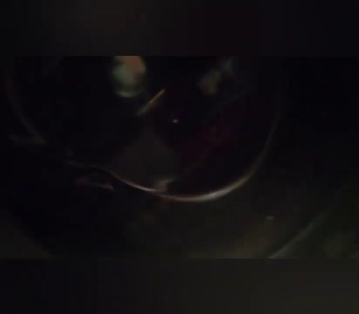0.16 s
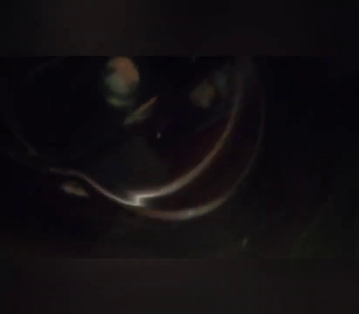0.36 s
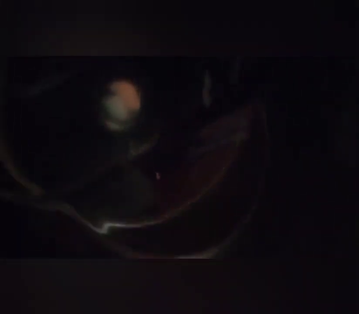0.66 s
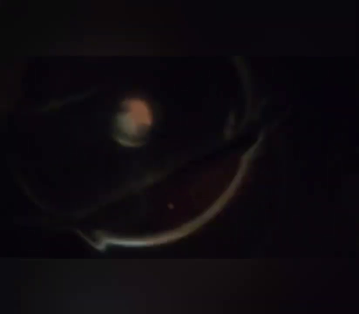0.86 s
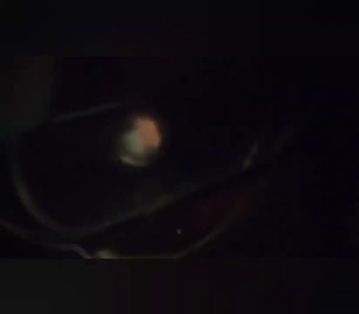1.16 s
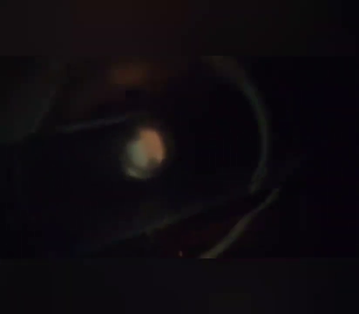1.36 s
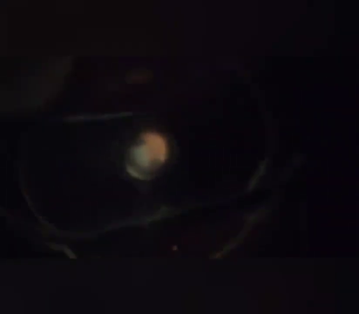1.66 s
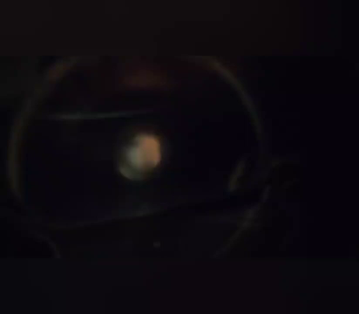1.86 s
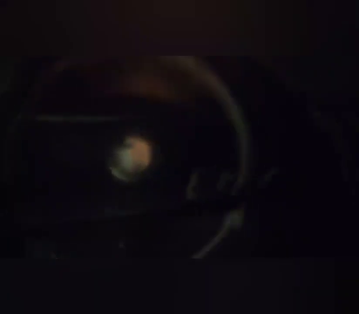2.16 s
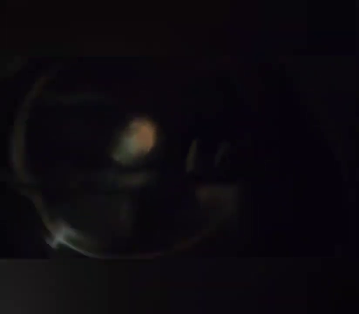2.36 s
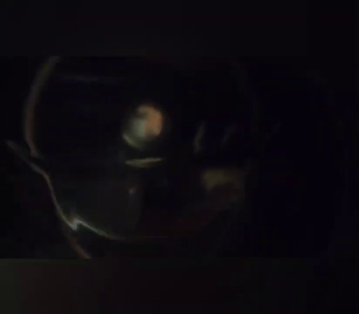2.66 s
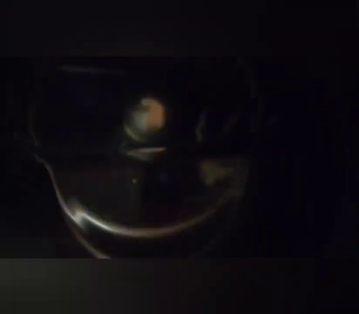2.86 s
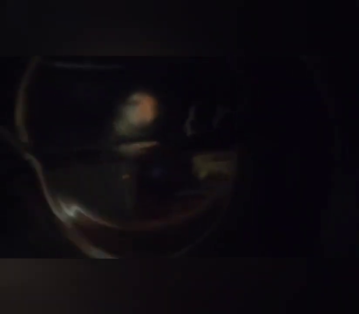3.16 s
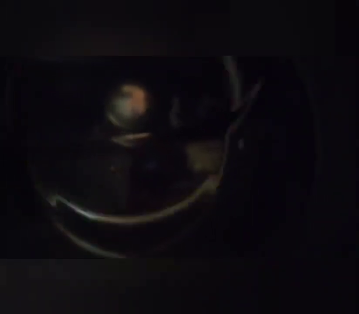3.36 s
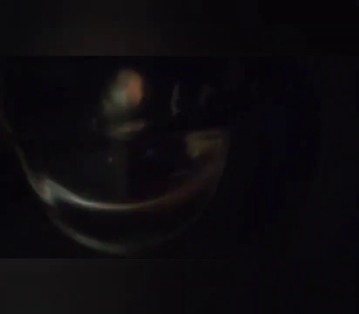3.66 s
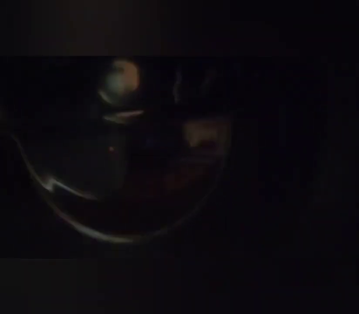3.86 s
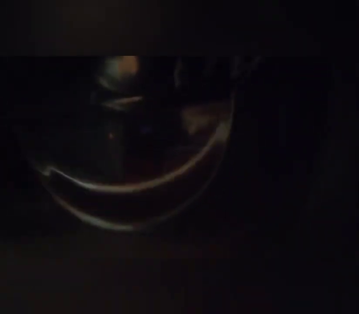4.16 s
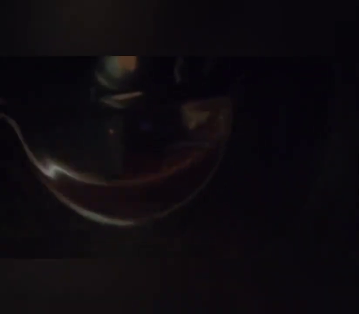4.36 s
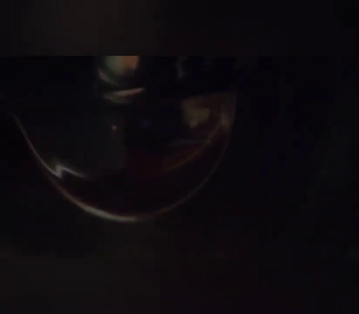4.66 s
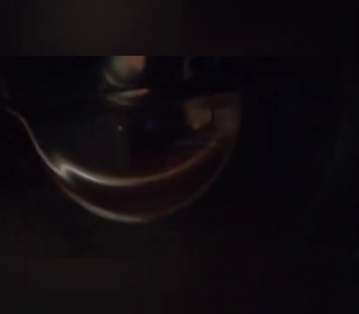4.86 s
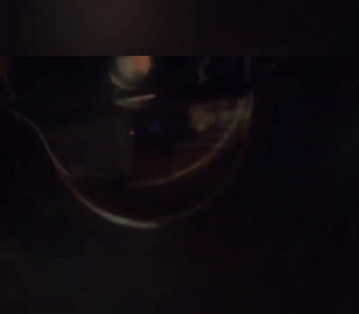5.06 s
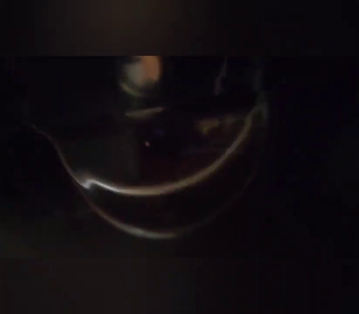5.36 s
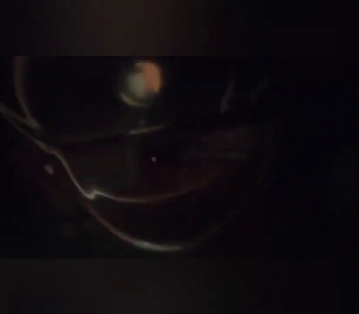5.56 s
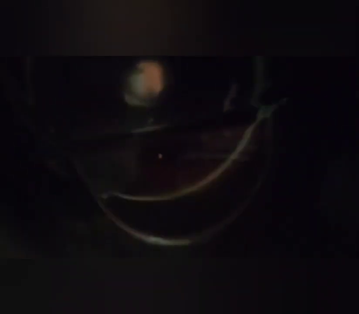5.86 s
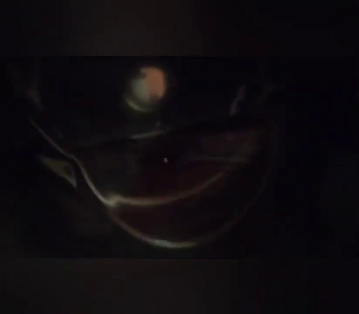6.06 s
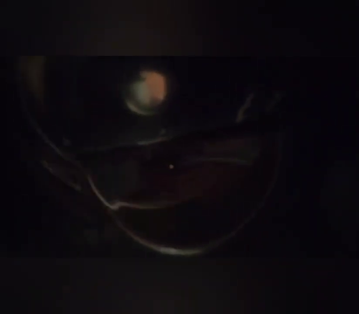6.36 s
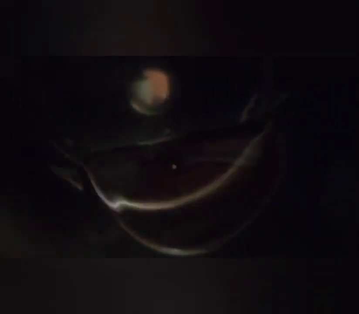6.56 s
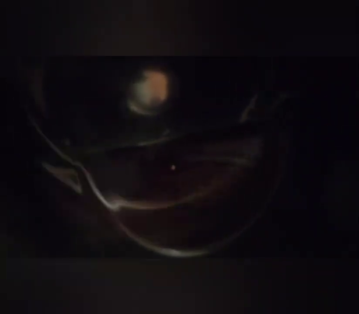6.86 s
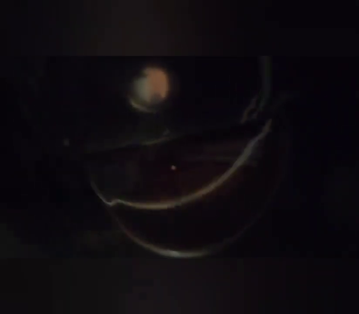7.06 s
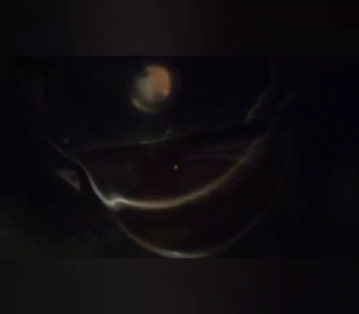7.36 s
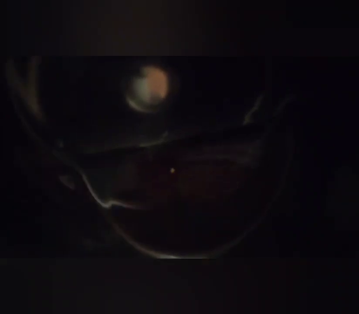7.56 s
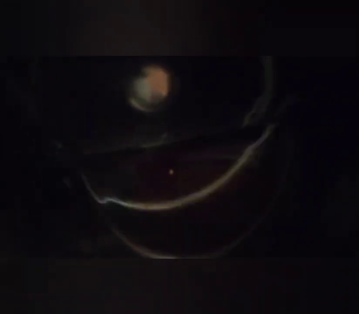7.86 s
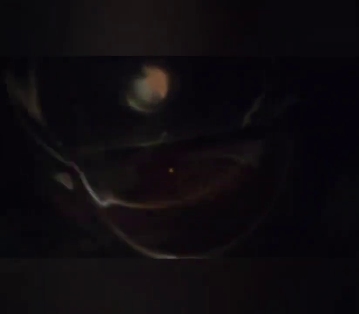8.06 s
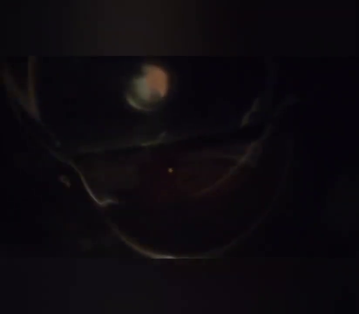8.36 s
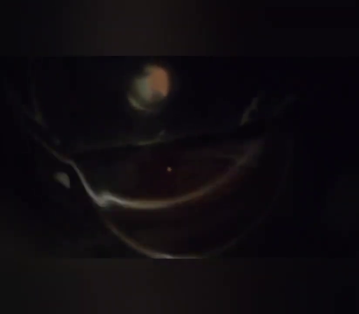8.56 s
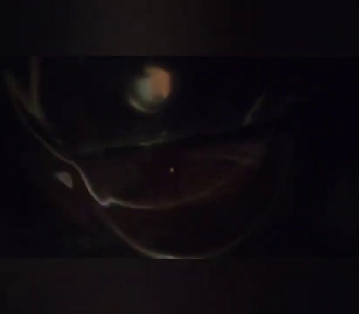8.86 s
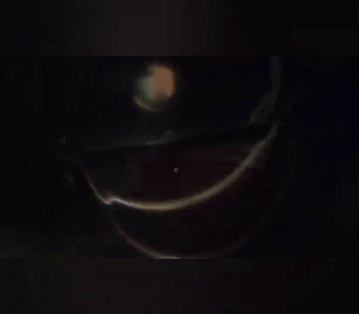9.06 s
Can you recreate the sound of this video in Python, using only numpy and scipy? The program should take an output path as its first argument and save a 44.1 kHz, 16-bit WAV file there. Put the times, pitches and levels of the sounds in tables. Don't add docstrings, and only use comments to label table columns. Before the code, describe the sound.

Close, continuous spin-cycle noise indoors: a deep cabinet drone with rapid drum throbbing, mains hum, and shrill whining from the brush motor. Rapid knocks ring lightly on the tub within broad watery hiss and gritty electrical buzz. Around one to two seconds a trim buzz joins, stronger on the left. The hand-held stereo pickup drifts, changing the tone, then settles into steadier noise.

```python
import sys
import numpy as np
from scipy import signal
from scipy.fft import irfft, next_fast_len
from scipy.io import wavfile
from scipy.ndimage import uniform_filter1d, map_coordinates

SR = 44100
rng = np.random.default_rng(int(sys.argv[2]) if len(sys.argv) > 2 else 0)


def level_to_linear(level):
    exponent = np.asarray(level, float) / 20
    return 10 ** exponent


def unload_wav(signal):
    wavfile.write(
        sys.argv[1],
        SR,
        np.round(np.clip(np.atleast_2d(signal).T, -1, 1) * 32767).astype(np.int16),
    )


N = 405719

DRUM_HZ, MOTOR_HZ, MAINS_HZ = 12.44651, 197.91, 49.945
DRUM_START = 0.011
T = np.arange(N) / SR
COARSE = T[::64]
SIZE = next_fast_len(N + 8192)
GRID = np.fft.rfftfreq(SIZE, 1 / SR)


def along(points, hz):
    f, v = np.transpose(points)
    return np.interp(np.log(hz + 1), np.log(f + 1), v)


def curves(rows):
    s, *cols = np.transpose(rows)
    return np.array([np.interp(COARSE, s, v) for v in cols])


def wobble(rate, count=2):
    knots = rng.standard_normal((count, int(N * rate / SR) + 4))
    return np.array([map_coordinates(k, [COARSE * rate]) for k in knots])


def sing(hz, envelope):
    angle = 2 * np.pi * hz * T
    c, s = np.cos(angle), np.sin(angle)
    ports = []
    for e in envelope:
        real = np.interp(T, COARSE, e.real)
        imag = np.interp(T, COARSE, e.imag)
        ports.append(real * c - imag * s)
    return np.sqrt(2) * np.array(ports)


# (frequency [Hz], left-right correlation)
PORT_LIKENESS = [(60, 1), (130, 0.74), (290, 0.87), (640, 0.093), (1410, -0.17), (3100, 0.017),
                 (6820, -0.009), (15000, -0.058)]
# (frequency [Hz], left minus right [dB])
PORT_LEAN = [(60, -1), (150, 2.5), (400, 3.5), (1400, 6.5), (4000, 1), (6200, 4.5), (7300, -6.5),
             (8600, -16), (10200, 0), (14500, 9.5)]


def lean_db(hz):
    return along(PORT_LEAN, hz) * np.array([[.5], [-.5]])


def stereo(gain):
    a, b = rng.standard_normal((2, len(GRID))) + 1j * rng.standard_normal((2, len(GRID)))
    mix = np.arccos(np.clip(along(PORT_LIKENESS, GRID), -1, 1)) / 2
    lean = level_to_linear(along(PORT_LEAN, GRID) / 2)
    left = (a * np.cos(mix) + b * np.sin(mix)) * lean
    right = (a * np.cos(mix) - b * np.sin(mix)) / lean
    top = np.where(GRID < 15250, 1, .3)
    spectrum = np.array([left, right]) * gain * top
    return irfft(spectrum * np.sqrt(SIZE * SR) / 2, SIZE)[:, :N]


def fading(hz, db, width_hz):
    power = np.zeros(len(GRID))
    near = np.round(hz / GRID[1]).astype(int)[:, None] + np.arange(-90, 91)
    width = width_hz[:, None]
    bell = np.exp(-.5 * ((GRID[near] - hz[:, None]) / width) ** 2) / width
    np.add.at(power, near, level_to_linear(db)[:, None] ** 2 * bell / np.sqrt(2 * np.pi))
    return stereo(np.sqrt(power))


# (drum order, level [dB rms])
CABINET_SHAKE = [(1, -39.5), (2, -54), (3, -53), (4, -51.5), (5, -43), (6, -62), (7, -62), (8, -75),
                 (9, -31.0), (10, -34.5), (11, -35), (12, -59.5), (13, -55), (14, -82), (15, -47.0),
                 (16, -83), (17, -60.5), (18, -66), (19, -57), (20, -56), (21, -45), (22, -63.5), (23, -56),
                 (24, -58.5), (25, -59), (26, -59), (27, -61), (28, -51.5), (29, -63.5), (30, -62.5)]
# (frequency [Hz], width [Hz])
PANEL_MODES = [
    (119, 6),
    (146, 6),
    (175, 12),
]


def cabinet():
    out = np.zeros((2, N))
    for order, db in CABINET_SHAKE:
        hz = order * DRUM_HZ
        lag = sum(np.arctan2(hz * width, mode * mode - hz * hz) for mode, width in PANEL_MODES)
        scatter = (hz > 200) * rng.uniform(0, 2 * np.pi)
        phase = 2 * np.pi * order * DRUM_START + .55 - lag + scatter
        apart = 0.019 * order * rng.standard_normal(2) * [[1], [-1]]
        drift_db = 0.036 * order * (wobble(1.13, count=1) + .4 * wobble(0.67))
        level = level_to_linear(db + drift_db + lean_db(hz) + 0.11 * order * apart[:, :1])
        out += sing(hz, level * np.exp(1j * (phase + apart[:, 1:])))
    return out


# (mains multiple, level [dB rms])
MAINS_HUM = [
    (2, -41.5),
    (4, -58),
    (6, -50.5),
]
# (motor order, level [dB rms])
SHAFT_TONES = [
    (1, -44.5),
    (2, -53),
    (4, -51),
]


def hum():
    out = np.zeros((2, N))
    for k, db in MAINS_HUM:
        start = np.exp(2j * np.pi * -0.31)
        out += sing(k * MAINS_HZ, level_to_linear(db + .6 * wobble(1.2)) * start)
    for k, db in SHAFT_TONES:
        out += sing(k * MOTOR_HZ, level_to_linear(db + 1.7 * wobble(0.7)) * np.exp(.3j * k * wobble(0.465)))
    return out


def tone(order, level_db, throb_db, shape, lag_turns, sway, lead):
    turn = 2 * np.pi * (DRUM_HZ * COARSE + DRUM_START - lag_turns)
    swing, twist = 0, 0
    for k, db in shape:
        bend = (k - 1) * (np.pi + 1.06 * wobble(0.536))
        swing = swing + level_to_linear(db + 2.0 * wobble(0.66)) * np.cos(k * turn + bend)
        twist = twist + level_to_linear(db + 0.79 * wobble(1.0)) * np.sin(k * turn + 1.14 * wobble(0.36))
    side = (swing + 1j * sway * twist) / np.sqrt(np.mean(swing ** 2 + (sway * twist) ** 2))
    depth = level_to_linear(throb_db)
    throb = (1 + depth * side) / np.sqrt(1 + depth ** 2)
    speed = order * (0.097 * wobble(1.503, count=1) + 0.0075 * wobble(8.6, count=1))
    phase = speed + 0.18 * wobble(0.49) + np.pi * lead * [[1], [-1]]
    return sing(order * MOTOR_HZ, level_to_linear(level_db) * throb * np.exp(1j * phase))


# (drum order, level [dB])
SLOT_PULSE = [(1, 0), (2, -12), (3, -17), (5, -19), (8, -17)]
# (drum order, level [dB])
BAR_PULSE = [(1, 0), (2, -6), (3, -12), (4, -17), (6, -20), (8, -19)]
# (time [s], left level [dB], right level [dB], left throb [dB], right throb [dB])
SLOT_WAVES = [(.2, -30.5, -44, 10, 11), (.6, -38, -38, 22, 12), (.83, -35, -42, 21, 18),
              (1.05, -37.5, -51, 7, 7), (1.45, -35.5, -48, 12, 6), (1.8, -39, -49, 9, 3),
              (2.0, -35, -40, -5, 3), (2.2, -33.5, -38.5, -2, 4), (2.55, -33.5, -40.5, -12, -8),
              (3.2, -33, -39, -11, -5), (3.55, -31, -43, -6.5, -7), (3.85, -34, -39, -5.5, -17),
              (4.3, -43, -39, 3, -16), (5.2, -38.5, -38.5, -3, -12), (5.8, -38, -43.5, 14, 16),
              (6.3, -41, -43.5, 2, 2), (7.6, -40, -44, -1, -3), (8.0, -40, -46.5, 5, 5)]
# (time [s], left level [dB], right level [dB], left throb [dB], right throb [dB])
BAR_WAVES = [(.15, -36, -49, 2, 5), (.35, -43, -32.5, 3, 6), (.75, -42.5, -45.5, 9, 17),
             (1.08, -36, -48, 8, 10), (1.5, -46, -50, 8, 3), (2.0, -38, -44, 2, 1), (2.2, -41, -35.5, 2, 6),
             (2.4, -52, -41.5, 4, 4), (2.7, -40.5, -43.5, 11, 1), (3.45, -45, -45, 9, 1),
             (3.7, -37.5, -39, 5, -1), (4.1, -38.5, -38.5, 10, 1), (4.5, -42, -40.5, 15, 2),
             (5.15, -41, -41.5, 9, 4), (5.45, -46, -48, 2, 3), (5.9, -50, -39, 6, 6),
             (7.0, -40, -40.5, 7, 7), (9.2, -42, -43.5, 3, 12)]
# (time [s], slot left [turns], slot right [turns], bar left [turns], bar right [turns])
PEAK_LAG = [(.2, -0.38, 0.18, 0.17, -0.16), (.9, -0.018, 0.57, 0.13, -0.27), (1.5, -0.29, 1.55, -0.54, .05),
            (2.2, 0.16, 1.3, -0.89, -0.19), (2.9, -0.019, 0.64, -0.72, 0.091),
            (4.2, -.1, 0.7, -0.53, -0.23), (5.3, .15, 0.56, -1.0, -0.26), (6.6, 0.25, 1.12, -1.1, 0.068),
            (9.2, 0.085, 1.08, -0.9, .1)]
# (time [s], slot lead [cycles], bar lead [cycles])
PORT_LEAD = [(.2, -0.15, 0.057), (.9, -0.36, 0.12), (2.0, -0.18, .1), (3.3, -0.32, -0.048),
             (4.0, 0.062, 0.28), (5.0, .02, 0.27), (5.6, -0.24, 0.054), (6.5, -0.25, 0.0065),
             (7.8, -0.21, 0.32), (9.2, -0.21, 0.32)]


def whine():
    slot, bar = curves(SLOT_WAVES), curves(BAR_WAVES)
    lag, lead = curves(PEAK_LAG), curves(PORT_LEAD)
    slots = tone(order=18, level_db=slot[:2], throb_db=slot[2:], shape=SLOT_PULSE,
                 lag_turns=lag[:2], sway=0.35, lead=lead[0])
    bars = tone(order=36, level_db=bar[:2], throb_db=bar[2:], shape=BAR_PULSE,
                lag_turns=lag[2:], sway=0.97, lead=lead[1])
    return slots + bars


# (frequency [Hz], level [dB per Hz])
TUB_HISS = [(20, -83), (62, -66.5), (130, -69.5), (270, -68), (500, -81.5), (760, -72), (1100, -77.5),
            (2600, -78.5), (4300, -87.5), (7300, -81.5), (8500, -93.5), (12000, -109), (14800, -109),
            (15500, -118)]


def hiss():
    turn = 2 * np.pi * DRUM_HZ * T
    pump = 1 + 0.051 * np.cos(turn + 1.0) + 0.095 * np.cos(2 * turn)
    return stereo(level_to_linear(along(TUB_HISS, GRID))) * pump


# (frequency [Hz], level of each drum order [dB rms])
RATTLE_LEVEL = [(390, -59.5), (540, -59), (680, -55.5), (770, -55), (880, -56), (990, -60.5), (1100, -58),
                (1400, -63), (1600, -63), (2200, -67), (2900, -85), (4000, -110)]
# (drum angle [turns], level [dB], width [turns])
LOOSE_KNOCKS = [
    (.18, 2, .07),
    (.52, 0, .03),
    (.66, 0, .05),
    (.9, -1, .04),
]


def rattle():
    hz = DRUM_HZ * np.arange(31, 300)
    db = along(RATTLE_LEVEL, hz) - 2 + 2.23 * rng.standard_normal(len(hz))
    lines = fading(hz, db, 0.053 + .00004 * hz)
    turn = (DRUM_HZ * T + DRUM_START) % 1
    gate = 8.2
    for at, knock_db, width in LOOSE_KNOCKS:
        gate = gate + level_to_linear(knock_db) * np.exp(-.5 * ((turn - at) / width) ** 2)
    return lines * gate / np.sqrt(np.mean(gate ** 2))


# (drum angle [turns], level [dB], width [turns])
TUB_STRIKES = [
    (.18, -42.5, .09),
    (.62, -47, .06),
    (.9, -49, .04),
]


def tub():
    turn = (DRUM_HZ * COARSE + DRUM_START) % 1
    ring = level_to_linear(-52.5)
    for k, (at, db, width) in enumerate(TUB_STRIKES):
        bell = -.5 * ((turn - at) / width) ** 2
        phase = 2.3 * k + 0.61 * wobble(0.66)
        ring = ring + level_to_linear(db + 0.73 * wobble(1.99)) * np.exp(bell + 1j * phase)
    modes = sing(64 * DRUM_HZ, ring)
    modes += sing(57 * DRUM_HZ, ring[::-1] * .4)
    modes += sing(68 * DRUM_HZ, ring * .35j)
    return modes * level_to_linear([[-.8], [-2.5]])


# (motor order, level [dB rms])
BRUSH_LINES = [(13, -56), (15, -61), (16, -57), (17, -56), (24, -59.5), (28, -60.5), (29, -64), (30, -53),
               (31, -58.5), (32, -61), (33, -61), (34, -59), (35, -57), (37, -58.5), (38, -60), (39, -60),
               (40, -62), (41, -66), (42, -67), (43, -70.5), (45, -76), (46, -74), (47, -70), (48, -66),
               (54, -63.5), (57, -74), (66, -74), (72, -67), (74, -74), (75, -74)]
# (frequency [Hz], level [dB rms])
WEAK_SPARKS = [(2300, -59), (5000, -67), (8000, -80), (9000, -69.5), (11000, -74.5), (14500, -85),
               (15200, -79), (15700, -95)]


def brushes():
    strong = dict(BRUSH_LINES)
    wander = 0.075 * wobble(1.6, count=1) + 0.013 * wobble(8, count=1)
    out = np.zeros((2, N))
    for order in range(12, 79):
        if order in (18, 36):
            continue
        hz = order * MOTOR_HZ
        turn = 2 * np.pi * DRUM_HZ * COARSE + 1.31 * wobble(.7) + rng.uniform(0, 2 * np.pi)
        pulse = .8 + .5 * np.cos(turn + .9) + .35 * np.cos(2 * turn + wobble(.6))
        tug = 0.056 * np.cos(turn + 1.32) + 0.019 * np.cos(2 * turn)
        phase = order * (tug + wander) + 1.55 * wobble(0.896)
        db = strong.get(order, along(WEAK_SPARKS, hz)) + lean_db(hz) + 1.0 * wobble(1.1)
        out += sing(hz, level_to_linear(db) * pulse * np.exp(1j * phase))
    return out


# (time [s], step toward the door [full steps], tilt toward the motor [full tilts])
HAND_PATH = [(0, 0.48, 0.29), (.35, 0.35, .1), (.7, 0.96, -0.055), (1.7, 1.26, -0.74), (2.0, 0.56, -.8),
             (2.3, -0.081, -0.92), (2.9, -1.1, -0.77), (3.3, -.45, -.95), (3.6, -0.33, -.35),
             (3.95, -0.54, 0.61), (4.4, -0.3, .85), (5.0, -.33, .25), (5.8, 0.44, -.1), (6.2, 0.6, 0.13),
             (6.8, 0.19, 0.26), (9.2, 0.36, 0.49)]
# (frequency [Hz], gain [dB])
STEP_COLOUR = [(250, -0.5), (520, 4.5), (2200, -0.3), (4600, .3), (12000, 0.7)]
# (frequency [Hz], gain [dB])
TILT_COLOUR = [(250, 0), (520, 0.4), (2200, 3.5), (4600, -0.9), (12000, 1.2)]
# (frequency [Hz], gain [dB])
START_COLOUR = [(2200, 0), (4600, 3.5), (12000, 2)]
# (frequency [Hz], gain change [dB per s])
SAG_COLOUR = [(2200, 0), (4600, -0.3), (12000, -0.3)]


def shaded(x):
    hz, t, z = signal.stft(x, SR, nperseg=1024)
    toward, tilt = [np.interp(t, COARSE, c) for c in curves(HAND_PATH)]
    moves = [(STEP_COLOUR, toward), (TILT_COLOUR, tilt), (START_COLOUR, np.ones(len(t))), (SAG_COLOUR, t)]
    colour_db = sum(np.outer(along(colour, hz), move) for colour, move in moves)
    mobile = 1 - np.exp(-.5 * (np.log(hz / 1000 + 0.012) / 0.31) ** 2)
    patches = uniform_filter1d(rng.standard_normal(z.shape), 9, 1)
    patches = uniform_filter1d(patches, 30, 2)
    db = mobile[:, None] * colour_db * [[[1.05]], [[.35]]] + 1.16 * patches / patches.std()
    return signal.istft(z * level_to_linear(db), SR, nperseg=1024)[1][:, :N]


# (drum order, level [dB rms])
TRIM_BUZZ = [
    (73, -50),
    (75, -52),
    (81, -53),
    (85, -59),
]


def trim():
    from_s, to_s, fade_s = 0.55, 2.02, .15
    near = (np.tanh((COARSE - from_s) / fade_s) - np.tanh((COARSE - to_s) / fade_s)) / 2
    out = np.zeros((2, N))
    for k, db in TRIM_BUZZ:
        level = near * level_to_linear(db + 1.3 * wobble(2.8))
        out += sing(k * DRUM_HZ, level * np.exp(.6j * wobble(1.2)))
    return out * level_to_linear([[2.5], [-2.5]])


def scene():
    steady = cabinet() + hum() + whine()
    broadband = hiss() + rattle() + tub() + brushes()
    return steady + shaded(broadband) + trim()


def top_cut(x):
    return signal.sosfilt(signal.butter(12, 15810, fs=SR, output="sos"), x)


def record(dry):
    return top_cut(dry)


dry = scene()
out = record(dry)
unload_wav(out)
```